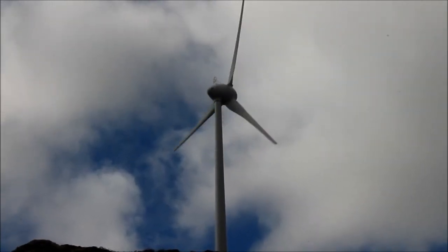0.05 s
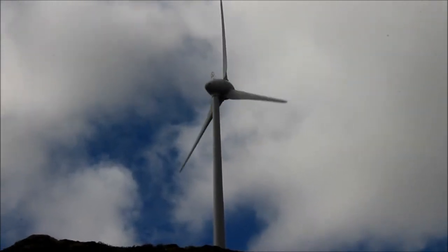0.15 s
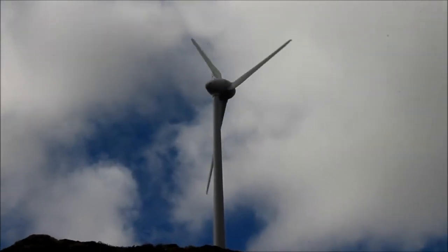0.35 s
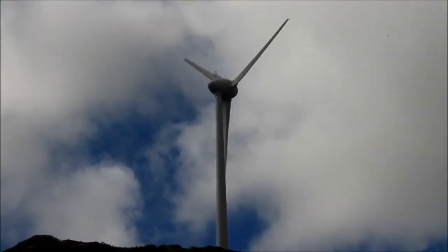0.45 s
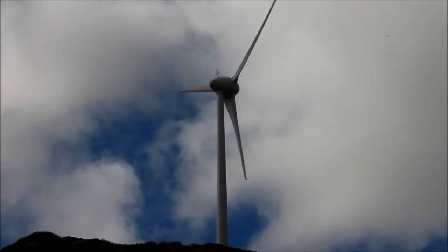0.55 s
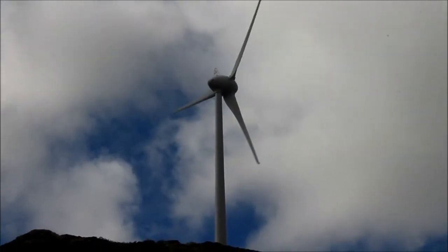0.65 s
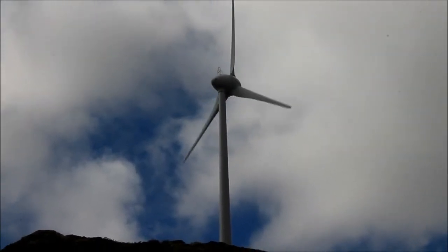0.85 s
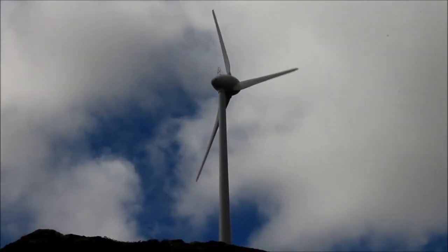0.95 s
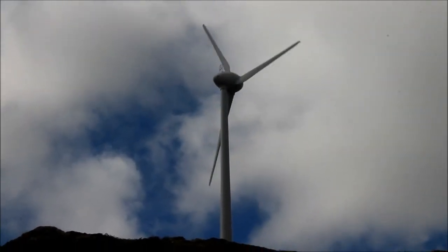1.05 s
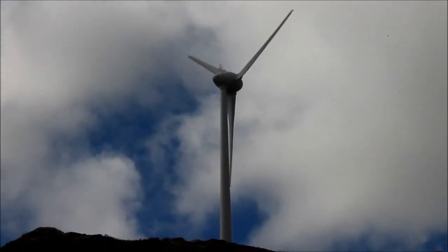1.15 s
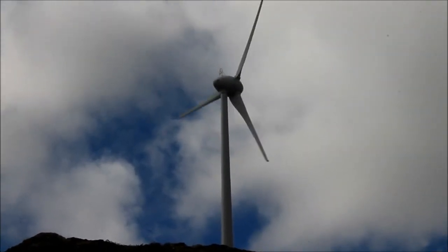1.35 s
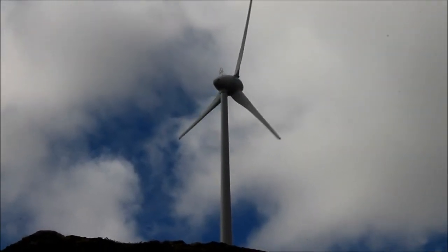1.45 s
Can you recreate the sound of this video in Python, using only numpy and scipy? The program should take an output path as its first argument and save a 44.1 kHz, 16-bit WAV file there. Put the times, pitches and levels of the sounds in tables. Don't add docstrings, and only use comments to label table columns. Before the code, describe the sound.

Gusty wind buffets a small microphone with lumpy low thumps over faint turbine hiss

```python
import sys
import numpy as np
from scipy import signal
from scipy.fft import rfft, irfft
from scipy.io import wavfile
from scipy.ndimage import uniform_filter1d

SR = 44100
rng = np.random.default_rng(int(sys.argv[2]) if len(sys.argv) > 2 else 0)


def transcribe(signal):
    frames = np.atleast_2d(signal).T
    limited = np.clip(frames, -1, 1)
    pcm = np.round(limited * 32767).astype(np.int16)
    wavfile.write(sys.argv[1], SR, pcm)


def field_ratio(decibels):
    return 10 ** (np.asarray(decibels, dtype=float) / 20)


N = 66150
GUST_REF_DB = -25


def evened(x):
    return x / np.sqrt(np.mean(x ** 2) + 1e-20)


def smooth_twice(x, size, axes=(0, 0)):
    for axis in axes:
        x = uniform_filter1d(x, size=size, axis=axis)
    return x


def read(points, hz):
    f, value = np.transpose(points)
    return np.interp(np.log(hz + 1), np.log(f + 1), value)


def unit(db):
    return db - 10 * np.log10(np.mean(field_ratio(db) ** 2, axis=0))


def shaped(field_db, size):
    hop = size // 4
    frames, hz = N // hop + 5, np.fft.rfftfreq(size, 1 / SR)
    real, imag, patches = rng.standard_normal((frames, len(hz), 3)).T
    patches = evened(smooth_twice(patches, 8, axes=(0, 1)))
    t = np.arange(frames) * hop / SR
    white = real + 1j * imag
    white_level = signal.istft(white, nperseg=size, noverlap=size - hop)[1].std()
    coloured = white * field_ratio(field_db(hz[:, None], t, patches))
    return signal.istft(coloured, nperseg=size, noverlap=size - hop)[1][:N] / white_level


# (f/Hz, level/dB per Hz)
AIR_HISS = [(300, -4.5), (900, 2.5), (1800, -2), (4000, -4), (5600, -16.5), (9000, -24), (12000, -30),
            (16500, -29.5)]
# (t/s, level/dB)
BLADE_PASSES = [(0, -48.5), (.17, -51), (.28, -52), (.6, -52), (.75, -51.5), (.85, -51), (1.0, -50),
                (1.1, -53), (1.32, -53.5), (1.38, -49.5), (1.5, -51.5)]


def hillside():
    swish_hz, swish_width, swish_gain_db, swish_depth = 3060, 0.75, 0.5, 1.63
    hiss_db, patch_db = -46.5, 1.56

    def field(hz, t, patches):
        bass_cut = 12 * np.log2(np.maximum(300 / (hz + 1), 1))
        steady = unit(read(AIR_HISS, hz) - bass_cut) + hiss_db
        swell = np.interp(t, *np.transpose(BLADE_PASSES))
        lift = swish_gain_db + swish_depth * (swell - swell.mean())
        band = np.exp(-(np.log((hz + 1) / swish_hz) / swish_width) ** 2 / 2)
        return steady + band * lift + patch_db * patches

    return shaped(field, size=512)


# (start t/s, length t/s, level/dB, change over its length level/dB)
PUFFS = [(.01, 0.023, -27.5, -8.5), (0.063, 0.082, -31, -4), (.203, 0.1, -15.5, 5), (0.346, 0.053, -23, 11),
         (0.432, 0.1, -15, -14), (0.606, 0.043, -30, 7), (0.642, 0.068, -24.5, -2.5),
         (.779, .045, -15, -12), (0.862, 0.051, -25, -4.5), (0.934, 0.049, -27.5, -2.5),
         (1.004, 0.093, -17, -0.5), (1.108, 0.064, -27, -5.5), (1.203, 0.049, -26.5, -5.5),
         (1.388, 0.046, -44.5, -1), (1.453, 0.022, -34, 3)]


def gust():
    rise_s, fall_s, lull_db = 0.0022, 0.011, -37
    t, power = np.arange(N) / SR, field_ratio(lull_db) ** 2
    for start, length, db, change_db in PUFFS:
        since = t - start
        rise = np.clip(since / rise_s, 0, 1)
        fall = np.exp(-np.maximum(since - length, 0) / fall_s)
        strength = field_ratio(db + change_db * np.clip(since / length, 0, 1))
        power = power + (rise * fall * strength) ** 2
    return 10 * np.log10(power)


# (f/Hz, level/dB per Hz)
CALM_COLOUR = [(18, -40.5), (30, -21.5), (119, 5.5), (292, 0.5), (355, -1), (819, -41), (1500, -34.5),
               (1950, -54.5), (3300, -120)]
# (f/Hz, level/dB per Hz)
STRONG_COLOUR = [(18, -44), (40, -19), (120, -4), (250, 0), (450, 0), (650, -5), (1100, -22), (2500, -54),
                 (4000, -100)]


def rumble(wind_db):
    rumble_db, flicker_db, lumps_db = -27.5, 4, 2
    calm_at_db, strong_at_db = -33, -16

    def coloured(colour):
        return shaped(lambda hz, t, patches: unit(read(colour, hz)) + lumps_db * patches, size=1024)

    flicker = evened(smooth_twice(rng.standard_normal(N), 250))
    share = np.clip((wind_db - calm_at_db) / (strong_at_db - calm_at_db), 0, 1)
    noise = np.sqrt(1 - share ** 2) * coloured(CALM_COLOUR) + share * coloured(STRONG_COLOUR)
    return field_ratio(rumble_db + wind_db - GUST_REF_DB + flicker_db * flicker) * noise


def swirl(hz, length, sign, noise):
    tail_stretch, glide, crackle_db, crackle_top_hz = 1.2, 0.15, -12, 1100
    t = (np.arange(len(noise)) - len(noise) // 2) / SR
    u = t / (length * np.where(t > 0, tail_stretch, 1) * 0.5)
    shape = np.exp(-np.log(2) * u ** 2)
    swing = sign * np.cos(2 * np.pi * hz * t * (1 - glide * np.tanh(u / 2)))
    f = np.fft.rfftfreq(len(noise), 1 / SR)
    ratio = f / hz
    colour = ratio / (1 + ratio) ** 2 / (1 + (f / crackle_top_hz) ** 6)
    crackle = irfft(rfft(noise) * colour, len(noise))
    crackle /= np.sqrt(np.average(crackle ** 2, weights=shape ** 2))
    return shape * (swing + field_ratio(crackle_db) * crackle)


def small_eddies(wind_db):
    per_s, level_db, spread_db, turns, kinds = 350, -25.5, 2.5, 1, 24
    chance, luck, pick = rng.random((N, 3)).T
    size = field_ratio(spread_db * np.minimum(-np.log(luck + 1e-9), 3)) * (chance < per_s / SR)
    kind = (pick * kinds).astype(int)
    out = np.zeros(N)
    for k, hz in enumerate(np.geomspace(120, 557, kinds)):
        eddy = swirl(hz, turns / hz, (-1) ** k, rng.standard_normal(2048))
        out += signal.oaconvolve(size * (kind == k), eddy, "same")
    return evened(out) * field_ratio(level_db + wind_db - GUST_REF_DB)


# (t/s, peak level/dB, f/Hz, length t/ms)
EDDIES = [(.066, -21, 214, 7.3), (0.09, -15.5, 173, 6), (.125, -11.5, 315, 3.1), (.220, -6, 150, 6.7),
          (0.259, -8.5, 215, 6), (.229, -.4, 320, 4.5), (.246, -6, 350, 5), (.271, -4.5, 345, 8),
          (.438, -7, 250, 5), (.462, -4, 258, 4), (.794, -2.5, 385, 4), (0.2999, 0.5, 338, 1.6),
          (.311, 1.5, 290.6, 9.5), (0.332, 5, 424, 4), (0.396, -7.5, 272, 7.5), (0.4259, 0, 364, 4.4),
          (.452, -5, 283, 2.2), (.632, -15.5, 239, 7.6), (0.645, -6, 234, 6.8), (.740, -18, 184, 4.6),
          (.7805, 4.5, 310, 3.5), (0.802, -11, 350, 3.2), (.913, -18, 233, 11), (.958, -6.5, 254, 3.1),
          (1.011, -11, 392, 4.8), (1.039, -11, 356, 6), (1.049, -4.5, 314, 3.7), (1.081, -6.5, 407, 5.4),
          (1.143, -12, 265, 4.9), (1.472, -16.5, 250, 3.6)]
# (t/s, peak level/dB, f/Hz)
FLICKS = [(.1235, -17, 830), (.219, -20.5, 1330), (.235, -12.5, 1170), (.2465, -6, 880), (.269, -8, 900),
          (.292, -15, 1105), (.3135, -20, 1515), (.373, -21.5, 1100), (.382, -21, 1310),
          (.399, -21.5, 1200), (.4235, -27, 1025), (.449, -29.5, 1000), (.479, -16.5, 800),
          (.498, -31, 696), (.523, -50, 700), (.627, -37, 690), (.7785, -13.5, 1473), (.789, -7.5, 700),
          (.885, -16.5, 915), (1.028, -38, 900), (1.049, -26, 1200), (1.083, -24.5, 920), (1.145, -23, 980),
          (1.228, -23.5, 506), (1.249, -24.5, 547), (1.47, -26.5, 530)]


def big_eddies():
    flick_turns = 0.9
    rows = [(s, db, hz, ms / 1000) for s, db, hz, ms in EDDIES]
    rows += [(s, db, hz, flick_turns / hz) for s, db, hz in FLICKS]
    out = np.zeros(N + 4096)
    for s, db, hz, length in rows:
        sign = np.sign(rng.standard_normal())
        sound = field_ratio(db) * swirl(hz, length, sign, rng.standard_normal(4096))
        part = out[round(s * SR):][:len(sound)]
        part += sound[:len(part)]
    return out[2048:N + 2048]


def scene():
    dip_db = -10
    wind_db, big = gust(), big_eddies()
    near = uniform_filter1d(abs(signal.hilbert(big)), size=200) / field_ratio(dip_db)
    turbulence = small_eddies(wind_db) + rumble(wind_db)
    return (hillside() + turbulence / (1 + near ** 2) + big)[None]


def roll_off(x):
    return signal.sosfilt(signal.butter(12, 16300, fs=SR, output="sos"), x)


def record(dry):
    ceiling, top_hz = 0.99, 16050
    cut = signal.sosfilt(signal.butter(2, 45, "high", fs=SR, output="sos"), dry)
    clipped = np.clip(cut, -ceiling, ceiling)
    treble_limit = signal.firwin(255, top_hz, window=("kaiser", 9), fs=SR)[None]
    return roll_off(signal.oaconvolve(clipped, treble_limit, "same"))


dry = scene()
out = record(dry)
transcribe(out)
```